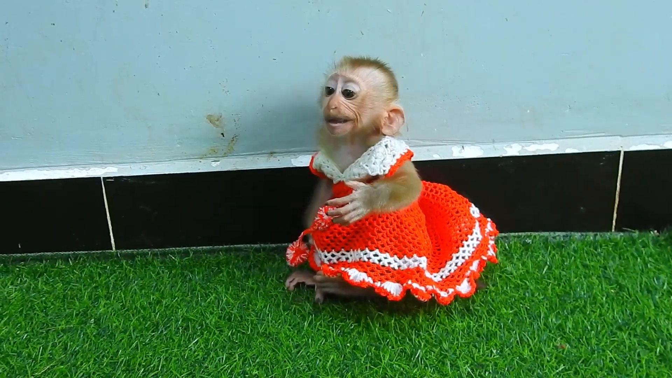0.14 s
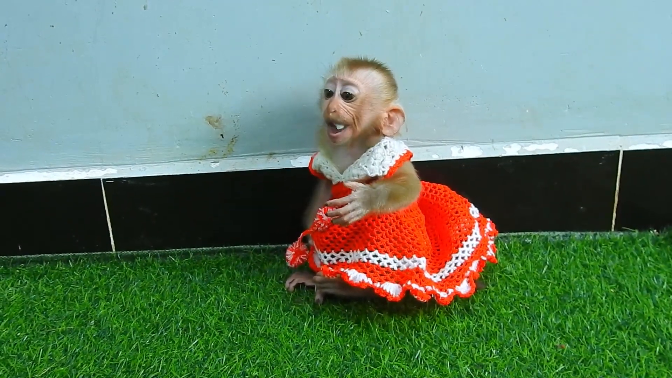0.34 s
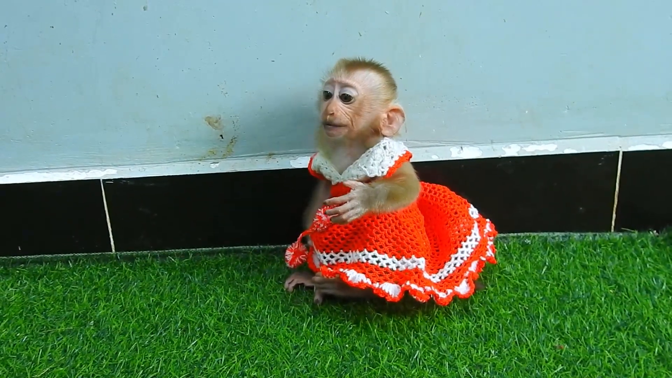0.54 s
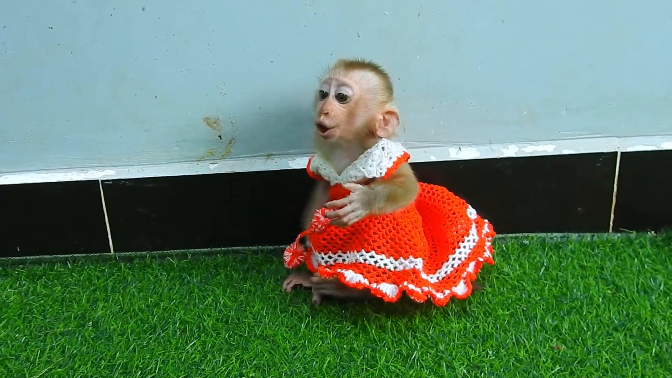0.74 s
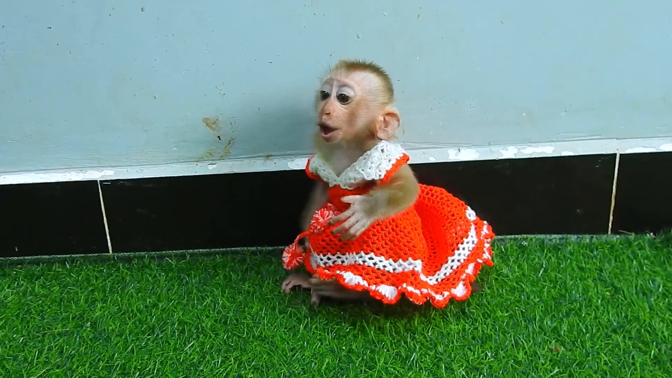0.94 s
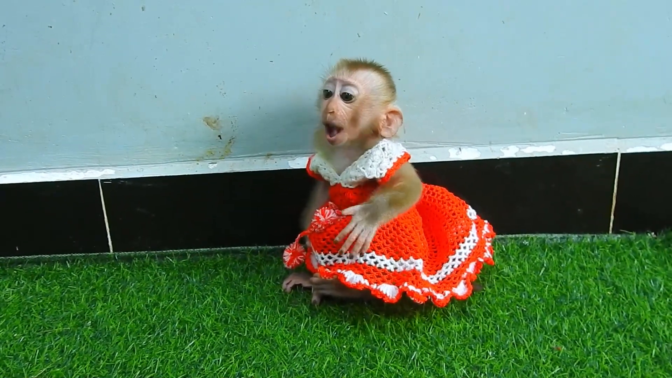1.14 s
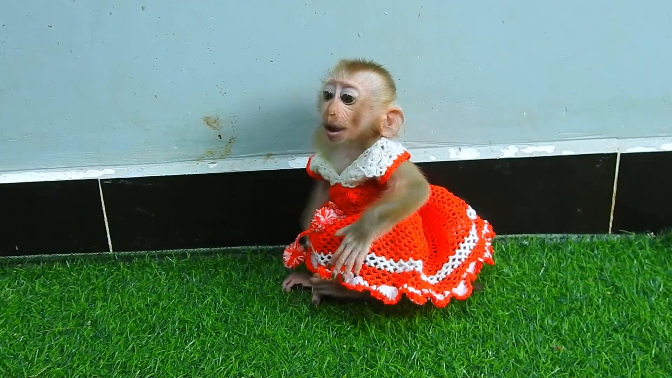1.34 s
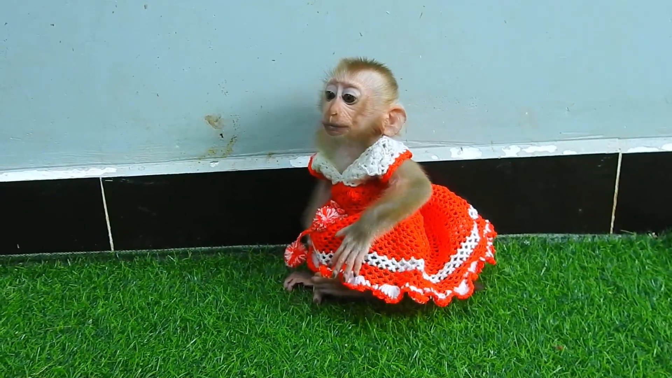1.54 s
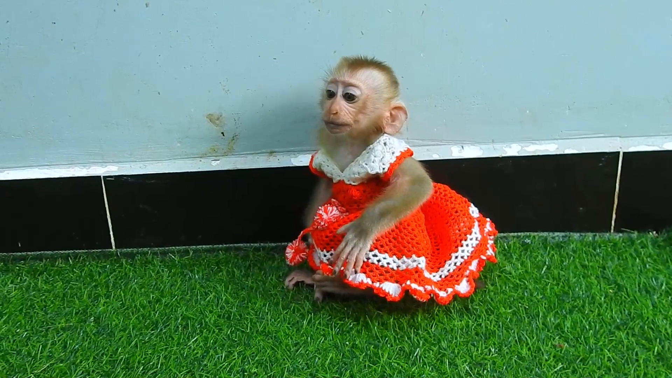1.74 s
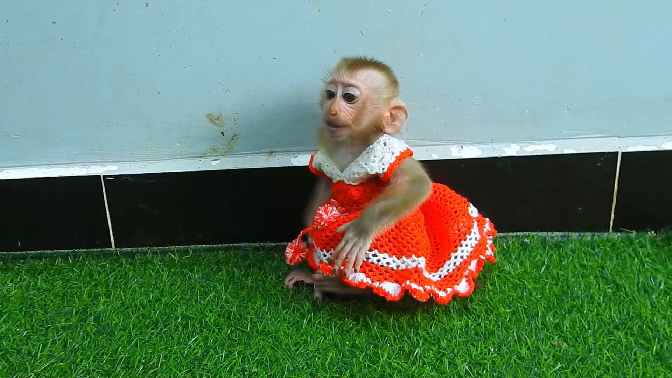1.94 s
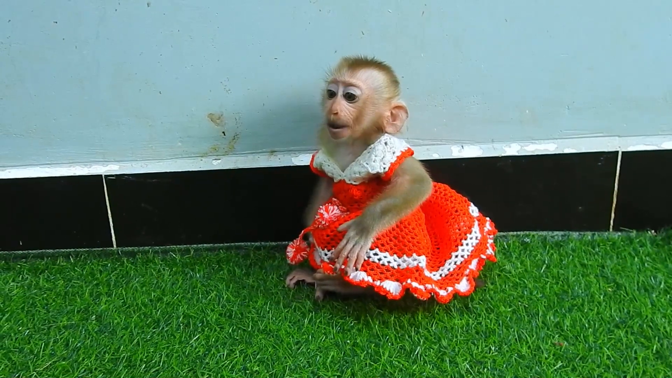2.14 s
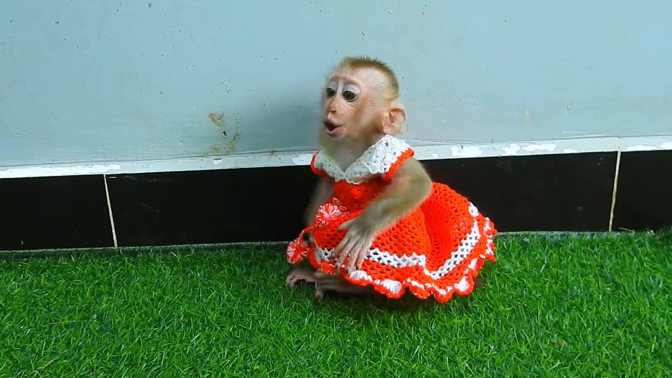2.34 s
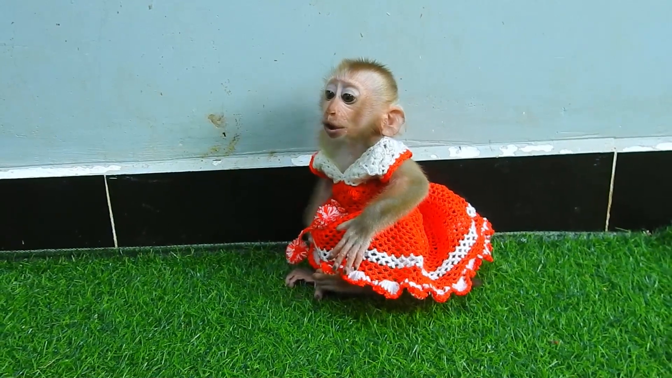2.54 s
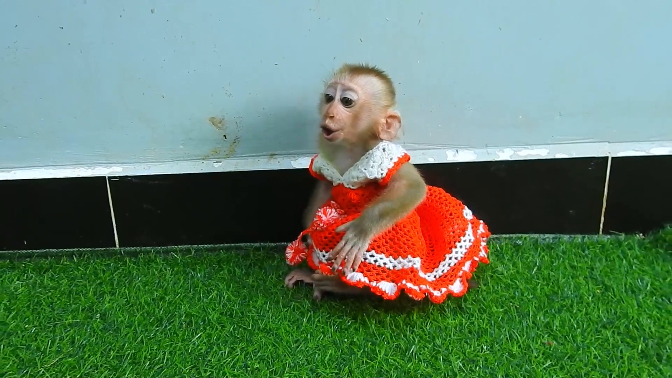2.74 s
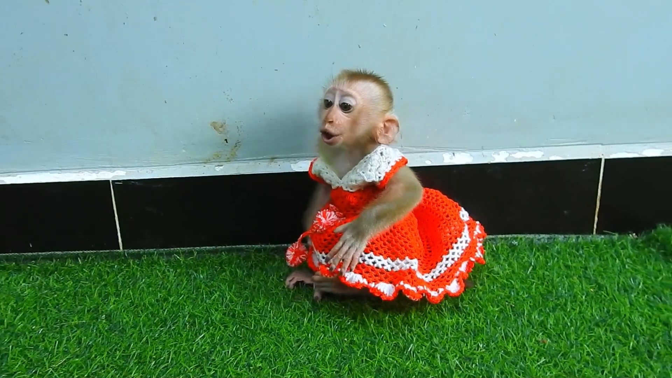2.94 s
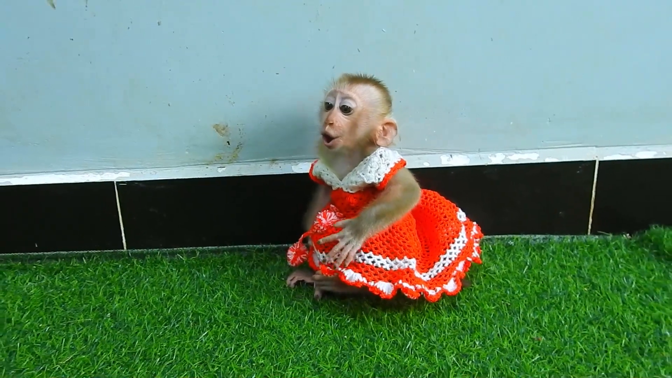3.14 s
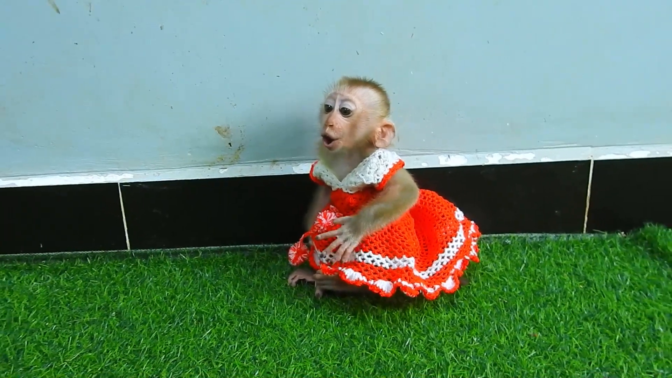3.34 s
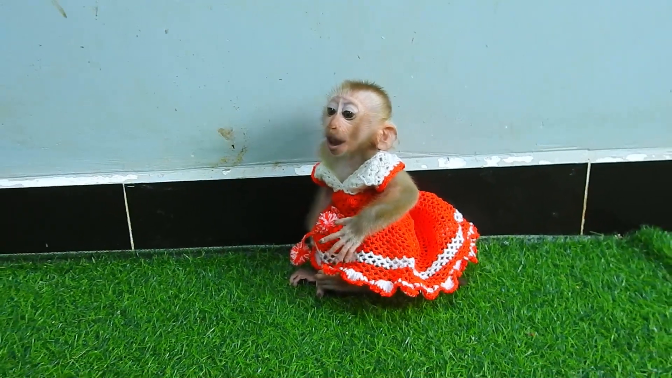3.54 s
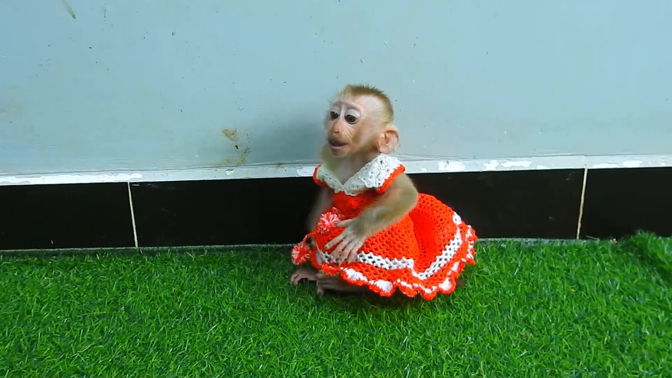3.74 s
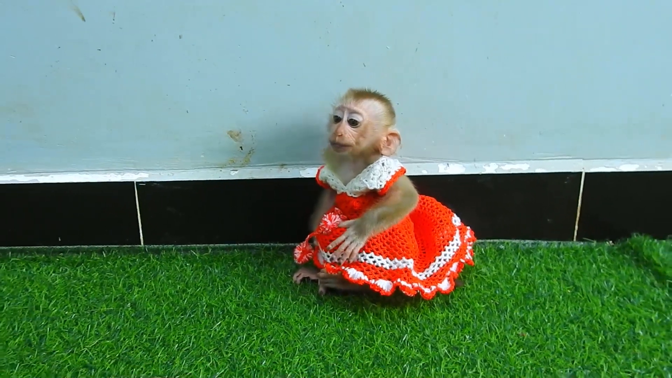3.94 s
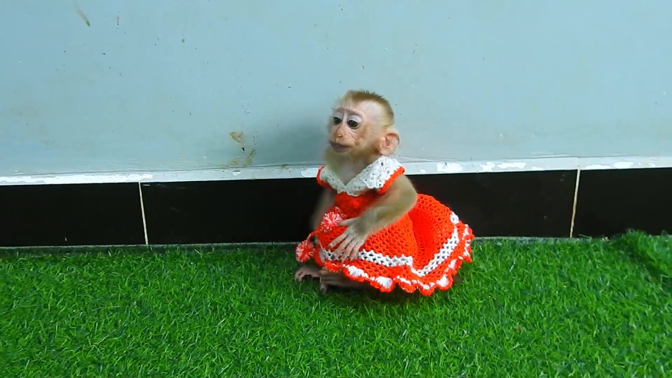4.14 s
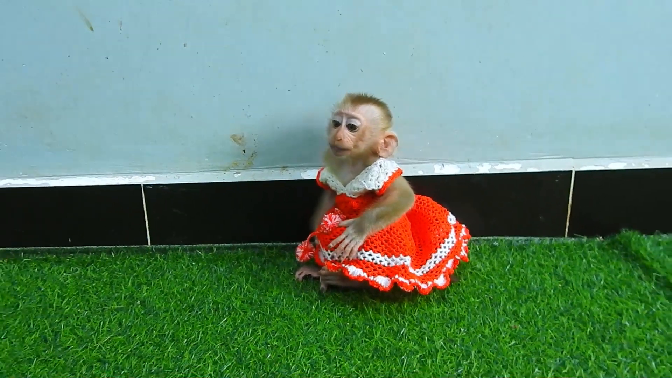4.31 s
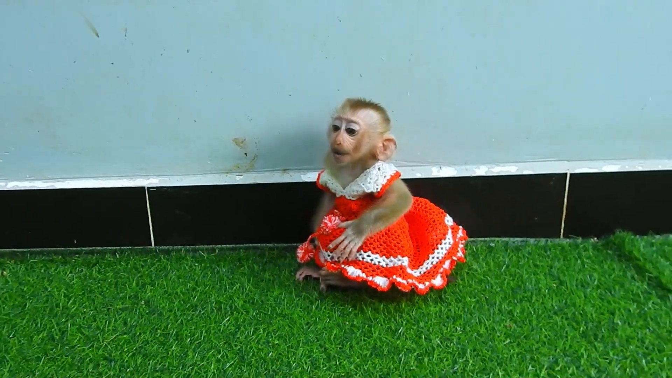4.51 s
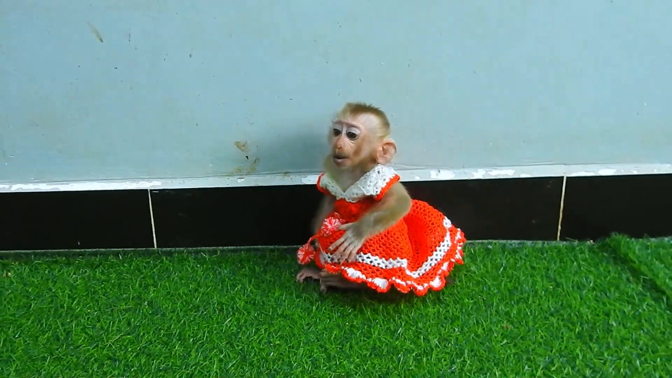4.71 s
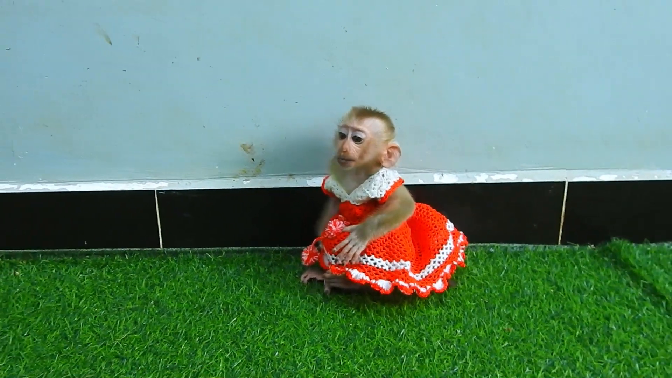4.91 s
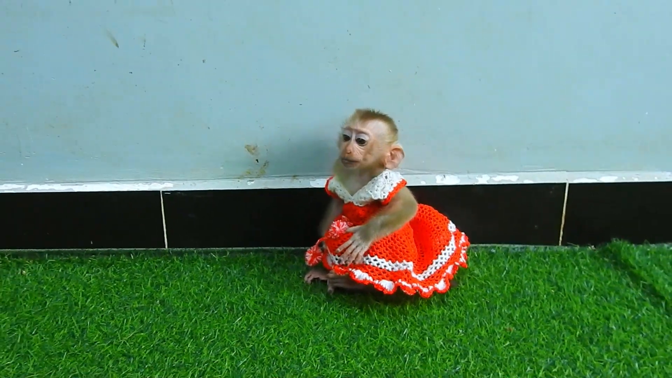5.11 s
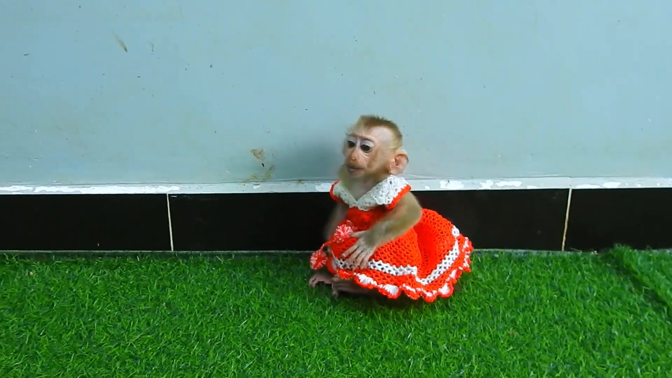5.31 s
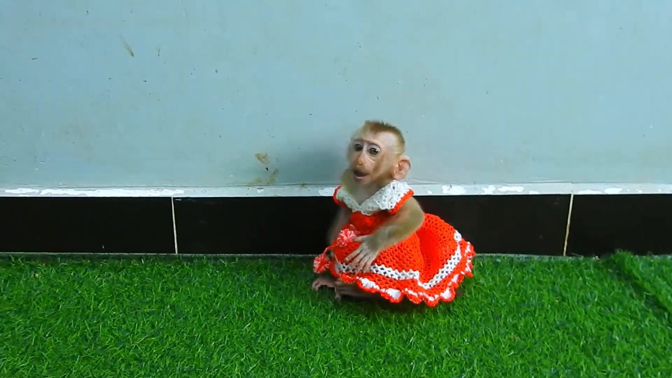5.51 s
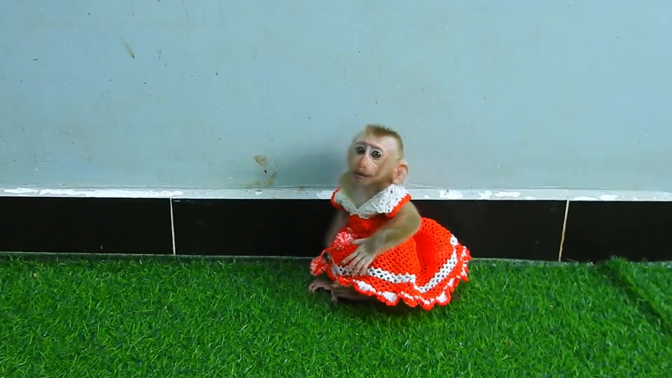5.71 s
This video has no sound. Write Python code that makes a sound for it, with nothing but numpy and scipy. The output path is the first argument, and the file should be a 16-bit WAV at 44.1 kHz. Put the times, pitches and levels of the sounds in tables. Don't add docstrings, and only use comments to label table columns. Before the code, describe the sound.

One clear, whistle-like monkey coo, then three quicker ones, ring off hard walls over faint house hum before small ticks and rustling fabric.

```python
import sys
import numpy as np
from scipy import signal
from scipy.fft import rfft, irfft, next_fast_len
from scipy.io import wavfile
from scipy.ndimage import uniform_filter1d

SR = 44100
rng = np.random.default_rng(int(sys.argv[2]) if len(sys.argv) > 2 else 0)


def volts_from_db(level):
    exponent = np.asarray(level, float) / 20
    return 10 ** exponent


def transcribe(u):
    v = np.clip(np.atleast_2d(u).T, -1, 1)
    q = np.round(v * 32767).astype(np.int16)
    wavfile.write(sys.argv[1], SR, q)


N = 258852


def at_hz(points, hz):
    table = np.array(points)
    return np.interp(np.log(np.maximum(hz, 1)), np.log(table[:, 0]), table[:, 1])


def in_time(rows):
    s, *columns = np.transpose(rows)
    return [np.interp(np.arange(N) / SR, s, c) for c in columns]


def gate(start_s, end_s, rise_s, fall_s):
    t = np.arange(N) / SR
    return np.clip((t - start_s) / rise_s, 0, 1) * np.clip((end_s - t) / fall_s + 1, 0, 1)


def bump(centre_s, width_s):
    t = np.arange(N) / SR
    return np.exp(-0.5 * ((t - centre_s) / width_s) ** 2)


def turning(hz, t):
    return np.exp(2j * np.pi * hz * t)


def coloured(spectrum):
    hz = np.fft.rfftfreq(N, 1 / SR)
    inside = (hz >= spectrum[0][0]) & (hz <= spectrum[-1][0])
    x = irfft(rfft(rng.standard_normal(N)) * volts_from_db(at_hz(spectrum, hz)) * inside, N)
    return x / x.std()


def drift(hz):
    return coloured([(0.031 * hz, 0), (hz, 0), (4 * hz, -24)])


def wide(mid, side):
    return np.array([mid + side, mid - side])


# [t/s, pitch f/Hz, level/dB, mouth brightness level/dB]
COOS = [
    [(0.742, 1045, -55.5, -63.5), (0.774, 1133, -35.5, -62.5), (0.805, 1108, -35, -61),
     (0.822, 1095, -42, -63), (0.846, 1143, -31.5, -58.5), (0.876, 1160, -28.5, -49),
     (0.94, 1148, -30, -55.5)],
    [(2.322, 1074, -45.5, -67.5), (2.336, 1154, -37.5, -70.5), (2.35, 1201, -38.5, -66),
     (2.396, 1170, -38, -64.5), (2.45, 1191, -30, -52.5), (2.472, 1184, -30, -51.5),
     (2.5, 1166, -38.5, -61.5)],
    [(2.77, 1123, -41, -71.5), (2.782, 1183, -34, -64.5), (2.794, 1213, -30, -55),
     (2.832, 1174, -28.5, -52), (2.842, 1175, -29, -50.5), (2.894, 1191, -32, -46.5),
     (2.928, 1174, -28.5, -50.5)],
    [(3.212, 1093, -43, -69), (3.234, 1190, -36, -60), (3.272, 1172, -31, -53.5), (3.298, 1176, -29, -49.5),
     (3.356, 1209, -25.5, -51.5), (3.366, 1223, -30, -51), (3.402, 1217, -30.5, -46)],
]
# [second partial level/dB, third partial level/dB, breath level/dB]
COO_COLOURS = [
    (-68, -61.5, -66),
    (-54, -65.5, -70.5),
    (-52.5, -62, -66.5),
    (-47, -62, -66.5),
]
# [f/Hz, level/dB]
THROAT = [(5200, -6.5), (5700, -16), (5950, 0.5), (7000, 0.5), (8050, -12.5), (8350, -5.5), (9200, -25.5),
          (9600, -14), (10800, -43.5), (12000, -38), (15000, -70)]
# [f/Hz, level/dB per Hz]
BREATH = [(300, -11.5), (1500, -2), (3300, -1), (4200, -19.5), (6500, -8), (8500, -10.5), (10500, -23),
          (15500, -43.5)]
# [t/s, level/dB]
CATCHES = [(.79, -63.5), (.855, -63), (2.335, -64), (2.38, -66), (2.94, -59), (3.355, -63), (3.41, -60)]


def monkey():
    out, air, t = np.zeros(N), coloured(BREATH), np.arange(N) / SR
    flutter_db = {1: 1.2, 2: 3}
    for rows, (second_db, third_db, breath_db) in zip(COOS, COO_COLOURS):
        start_s, end_s = rows[0][0], rows[-1][0]
        pitch_hz, first_db, bright_db = in_time(rows)
        closing_db, flat_hz = bright_db - bright_db.max(), pitch_hz - pitch_hz.max()
        second_db = second_db + 0.92 * closing_db + 0.03 * flat_hz
        third_db = third_db + 0.1 * closing_db + 0.05 * flat_hz

        tremor = 1 + 0.001 * drift(40)
        since = np.clip(t - start_s, 0, 1) / 0.012
        scoop = 0.028 * since * np.exp(-since)
        pitch_hz = uniform_filter1d(pitch_hz, size=650) * (1 + scoop) * tremor
        phase = 2 * np.pi * np.cumsum(pitch_hz) / SR

        levels_db = [first_db + 1.63, second_db + 0.5, third_db + 2.5, 0.73 * first_db - 50]
        levels_db += [bright_db - 2.5 + at_hz(THROAT, k * pitch_hz) for k in range(5, 13)]
        voice = 0
        for k, db in enumerate(levels_db, 1):
            voice = voice + volts_from_db(db + flutter_db.get(k, 0.46) * drift(27)) * np.sin(k * phase)

        gusts = volts_from_db(1.5 * drift(35))
        puffing = 1 + 0.67 * np.sin(phase)
        breath = volts_from_db(breath_db + 0.36 * closing_db) * gusts * air * puffing
        out += (np.sqrt(2) * voice + breath) * gate(start_s, end_s, 0.0036, 0.014)
    puffs = sum(volts_from_db(db) * bump(s, 0.0053) for s, db in CATCHES)
    return out + puffs * air


# [f/Hz, T60 t/s]
ROOM_T60 = [(300, 3.3), (1200, 1.08), (2400, 0.48), (6000, 0.7), (9000, .45), (15000, .3)]
# [f/Hz, level/dB]
ROOM_COLOUR = [(1300, -26), (2300, -10), (3600, -6), (4800, -11), (6000, -4), (7200, -4.5), (9000, -7)]
# [f/Hz, level/dB]
SIDE_SHARE = [(1300, 5.5), (2300, 7.5), (3600, -9.5), (4800, -5.5), (6000, 1.5), (9000, 0)]


def room(x):
    t = np.arange(int(1.5 * SR)) / SR
    hz, size = np.fft.rfftfreq(len(t), 1 / SR), next_fast_len(N + len(t))
    centres, parts = np.geomspace(300, 15000, 12), []
    swell = np.clip((t - 0.004) / 0.0099, 0, 1)
    for extra in ([(1, 0.0045)], SIDE_SHARE):
        white, tail = rfft(rng.standard_normal(len(t))), 0
        for k, centre in enumerate(centres):
            share = np.interp(np.log(hz + 1), np.log(centres), np.arange(12) == k)
            dying = volts_from_db(-60 * t / at_hz(ROOM_T60, centre)) * swell
            level = volts_from_db(at_hz(ROOM_COLOUR, centre) + at_hz(extra, centre)) / np.sqrt(np.sum(dying ** 2))
            tail = tail + level * dying * irfft(white * share, len(t))
        parts.append(irfft(rfft(x, size) * rfft(tail, size), size)[:N])
    return wide(*parts)


# [t/s, f/Hz, level/dB, decay level/dB per s, octave level/dB]
RINGS = [
    (.945, 1143, -36.5, 63, -65),
    (2.502, 1184, -33, 58.5, -62),
    (2.94, 1186, -31, 35.5, -56),
    (3.409, 1212, -30, 68, -48),
]
# [offset f/Hz, level/dB against ring, fifth partial level/dB]
NEIGHBOURS = [
    (32.5, -14.5, -67.5),
    (-29, -9.5, -66.5),
    (-37.5, -13, -64),
    (32, -13.5, -55),
]
# [t/s, half width t/s, depth level/dB]
NULLS = [(0.948, 0.0056, -8), (0.995, 0.0092, -24), (1.03, 0.054, -4), (1.051, 0.0085, -21),
         (1.179, 0.012, -2.5), (1.215, 0.024, -20), (1.238, 0.0083, -20), (1.297, 0.0084, -16.5),
         (1.4, 0.053, -15), (2.558, 0.031, -27), (2.591, 0.0043, -29), (2.61, 0.052, -6),
         (2.639, 0.017, -16.5), (2.96, 0.0055, -18), (3.0, 0.092, -7), (3.032, 0.01, -6),
         (3.051, 0.006, -14.5), (3.073, 0.025, -19), (3.211, .05, -14), (3.44, 0.0066, -8.5),
         (3.489, .02, -3), (3.509, 0.0086, -17), (3.57, 0.004, -21), (3.625, 0.018, -17.5),
         (3.676, 0.029, -19), (3.736, 0.0057, -11.5), (3.84, 0.014, -7.5), (3.95, 0.064, -13)]
# [t/s, half width t/s, left-right level/dB]
SWAYS = [
    (1.02, 0.021, 7.5),
    (2.54, 0.027, -5),
    (2.985, 0.02, -6),
    (3.07, 0.018, -9.5),
    (3.41, .02, 3),
    (3.75, 0.13, 4),
]


def standing_waves():
    out, t, beats = np.zeros((2, N)), np.arange(N) / SR, 1
    for s, width_s, db in NULLS:
        beats = beats * (np.tanh((t - s) / width_s) + 1j * volts_from_db(db)) / abs(1 + 1j * volts_from_db(db))
    flutter = (drift(6.4) + 1j * drift(40)) * 0.64 + 0.64
    pan_db = sum(db * bump(s, width_s) for s, width_s, db in SWAYS)
    next_coo_s = [rows[0][0] for rows in COOS[1:]] + [N / SR]
    for ring, neighbour, masked_s in zip(RINGS, NEIGHBOURS, next_coo_s):
        s, hz, db, decay_db_s, octave_db = ring
        above_hz, under_db, fifth_db = neighbour
        since = np.maximum(t - s, 0)

        ripple = 1 + volts_from_db(under_db - 16 * since) * turning(above_hz, since)
        tone = volts_from_db(db + 4.5 - decay_db_s * since) * (beats * ripple * turning(hz, since)).imag

        octave_beat = 1 + volts_from_db(-6.5) * turning(42.1, since)
        octave = volts_from_db(octave_db + 1 - 75 * since) * (flutter * octave_beat * turning(2 * hz, t)).imag
        fifth = volts_from_db(fifth_db - 92 * since) * np.sin(10 * np.pi * hz * t)

        panned = tone * volts_from_db(pan_db * [[0.5], [-0.5]])
        out += (panned + octave + fifth) * gate(s, min(s + 0.68, masked_s), 0.0077, 0.0018)
    return out


# [t/s, peak level/dB, f/Hz]
TICKS = [
    (0.1466, -68, 5960),
    (0.236, -59, 4300),
    (2.3017, -58, 6800),
    (3.037, -58.5, 6170),
    (4.6032, -44, 5800),
    (4.8314, -49, 6050),
    (5.3406, -47, 5000),
]


def ticks():
    out, t = np.zeros(N), np.arange(300) / SR
    shape = volts_from_db(-60 * t / 0.002) * np.clip(t / 0.00023, 0, 1)
    for s, db, hz in TICKS:
        at = round(s * SR)
        out[at:at + 300] += volts_from_db(db) * np.sin(2 * np.pi * hz * t) * shape
    return out


# [t/s, hold t/s, release t/s, fibres level/dB]
STROKES = [
    (4.644, 0.2, .02, -76.5),
    (4.817, .26, .2, -67.5),
    (5.3, .02, .03, -78),
    (5.35, .08, 0.21, -73.5),
]


def rustle():
    fibres = [(4000, -6.0), (5200, -3.5), (6600, 0.5), (7600, -8), (9000, -18), (12000, -35)]
    t, drag = np.arange(N) / SR, 0
    for s, hold_s, release_s, db in STROKES:
        release_db = 13.5 * np.clip((t - s - hold_s) / release_s, 0, 4)
        drag = drag + volts_from_db(db - release_db) * gate(s, N / SR, 0.017, 1)
    grain = volts_from_db(1.2 * drift(60))
    bright = drag * grain * wide(coloured(fibres), volts_from_db(-1.5) * coloured(fibres))

    from_fold_s = t - 4.87
    crease = volts_from_db(-69.5 + np.minimum(90 * from_fold_s, -49 * from_fold_s))
    return bright + crease * coloured([(2700, -10), (3300, 3), (3900, -12)])


# [f/Hz, level/dB per Hz]
HUM = [(15, -30), (25, -14.5), (49, -7), (69, -12.5), (86, 0), (113, -5), (134, -15), (152, -4.5),
       (253, -7), (361, -7), (701, -6), (857, -6), (1000, -11), (1300, -33.5), (2200, -120)]
HUM_SIDE = [(15, -46.5), (25, -6), (59, -8.5), (145, -7.5), (249, -6), (345, -11), (1000, -8), (1300, -39),
            (2200, -120)]
# [f/Hz, level/dB per Hz]
HISS = [(590, -34.5), (1000, 0.5), (1190, -0.5), (1490, -4.5), (1790, -5.5), (2440, -12), (3040, -14),
        (3370, -11.5), (3950, -18.5), (4380, -16), (6620, -15), (9440, -33), (15400, -44)]
HISS_SIDE = [(590, -31.5), (1000, -9.5), (1030, -4), (1130, -0.5), (1480, -2.5), (2390, -5.5), (3570, -8.5),
             (3950, -10.5), (6540, -3.5), (8520, -17), (15400, -29)]
# [f/Hz, wander as share of f, usual level/dB]
DRONES = [
    (103.3, 0.024, -76.5),
    (126.2, .012, -82),
    (206.8, 0.015, -79.5),
    (269.3, .022, -87),
]
# [t/s, length t/s, gain level/dB]
SPELLS = [
    [(5.4, .6, -3)],
    [(1.4, 2.13, 12), (3.7, 1.1, 5), (4.9, 1.13, 11)],
    [(.7, 0.3, 15), (2.3, 2.2, 5), (5.5, 0.46, 8)],
    [(-.2, .8, 15), (1.8, 0.99, 8), (3.8, 0.67, 9.5), (5.6, 0.96, 15.5)],
]


def house():
    hum = volts_from_db(-65.5) * wide(coloured(HUM), volts_from_db(-13.5) * coloured(HUM_SIDE)) * volts_from_db(0.5 * drift(3.7))
    hiss = volts_from_db(-66) * wide(coloured(HISS), volts_from_db(-9) * coloured(HISS_SIDE))
    drones, loudest_db = 0, -69.5
    for (hz, wander, db), spells in zip(DRONES, SPELLS):
        for s, length_s, gain_db in spells:
            db = db + gain_db * gate(s, s + length_s, 0.15, 0.15)
        phase = 2 * np.pi * np.cumsum(hz * (1 + wander * drift(4.4))) / SR
        waver_db = 1.5 + 1.8 * drift(4.7)
        drones = drones + volts_from_db(np.minimum(db, loudest_db) + waver_db) * np.sin(phase)
    return hum + hiss + drones


def scene():
    near = monkey() + ticks()
    direct = near * volts_from_db(np.array([[0.3], [-0.3]]))
    return direct + room(near) + standing_waves() + house() + rustle()


def limiter(x):
    limit_db, release_db_s, step = -27, 90, 128
    over_db = 20 * np.log10(np.abs(x).max(axis=0) + 1e-9) - limit_db
    ramp = release_db_s * np.arange(N) / SR
    held_db = np.maximum.accumulate(np.maximum(over_db, 0) + ramp) - ramp
    return x * volts_from_db(-0.5 * held_db[np.arange(N) // step * step])


def band_limit(x):
    return signal.sosfilt(signal.butter(12, 15600, fs=SR, output="sos"), x)


def record(dry):
    cut = signal.sosfilt(signal.butter(6, 40, "high", fs=SR, output="sos"), dry)
    return band_limit(limiter(cut))


dry = scene()
out = record(dry)
transcribe(out)
```